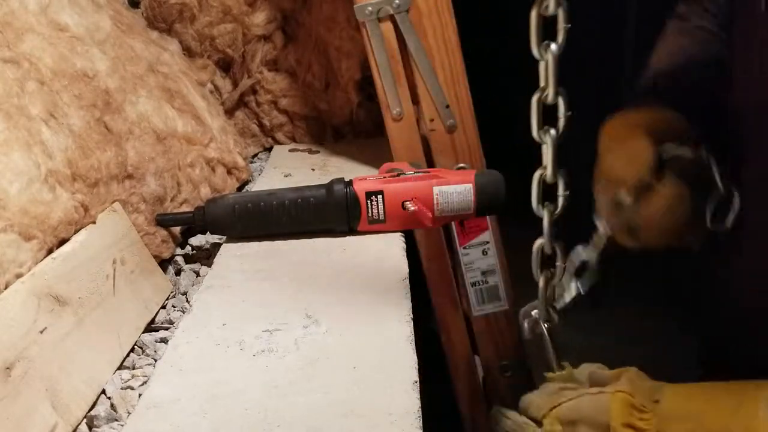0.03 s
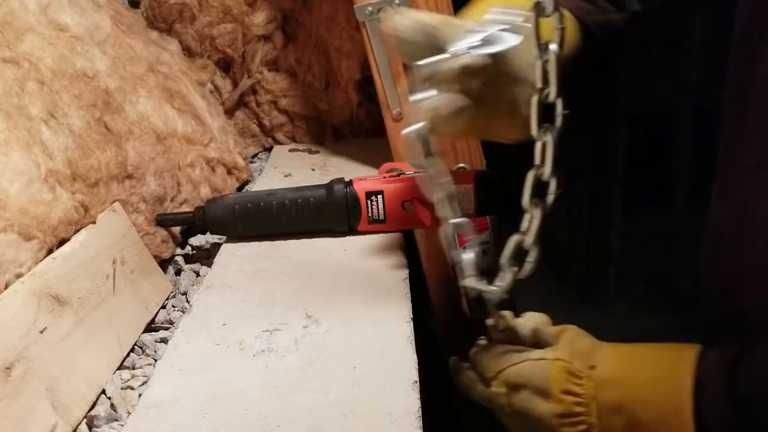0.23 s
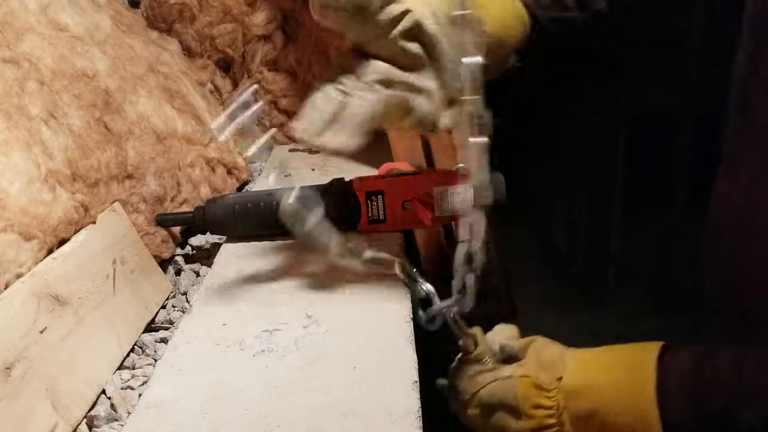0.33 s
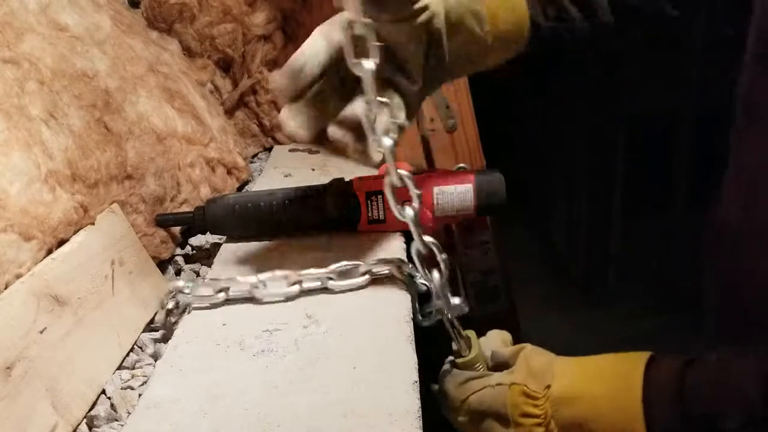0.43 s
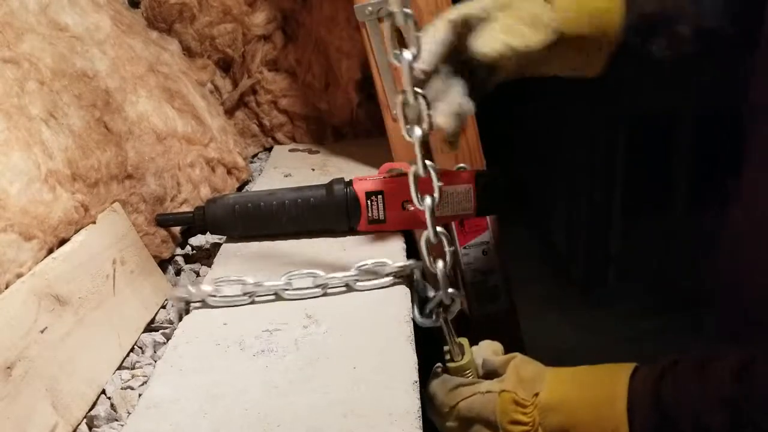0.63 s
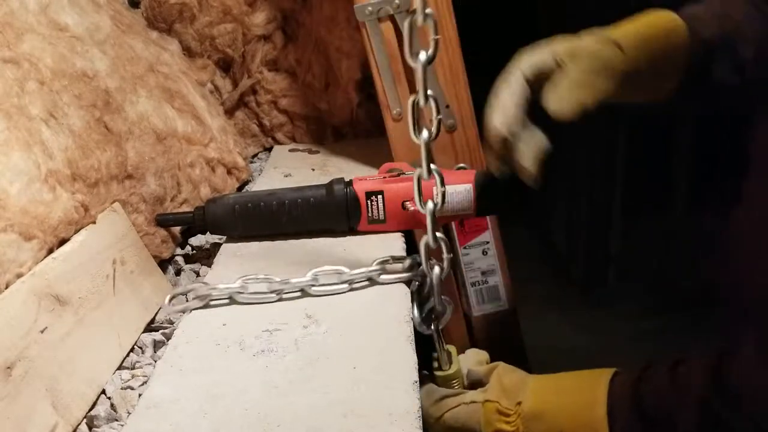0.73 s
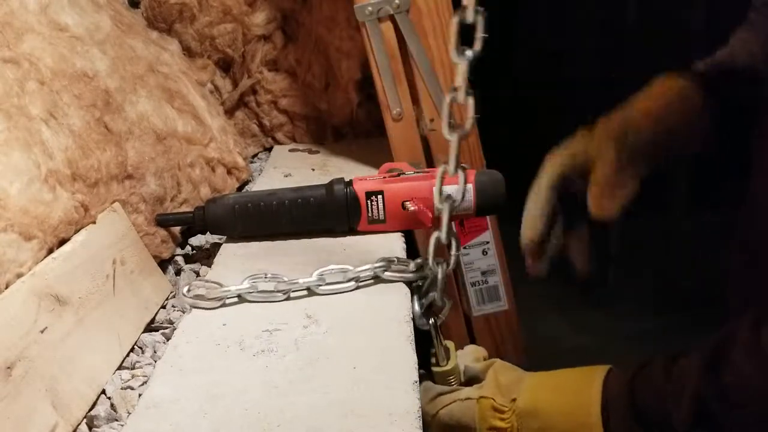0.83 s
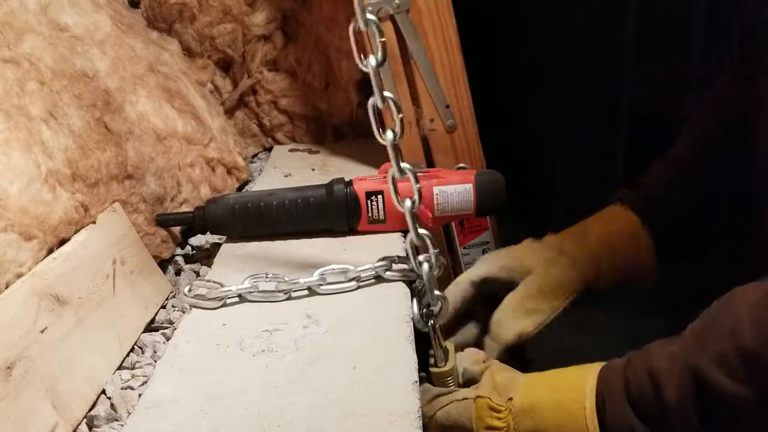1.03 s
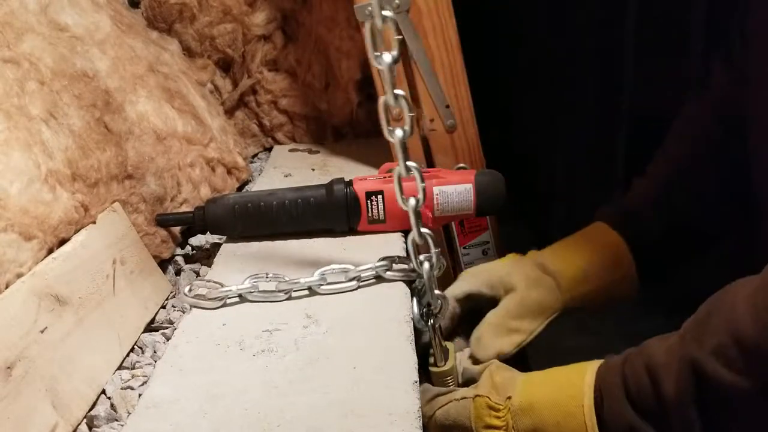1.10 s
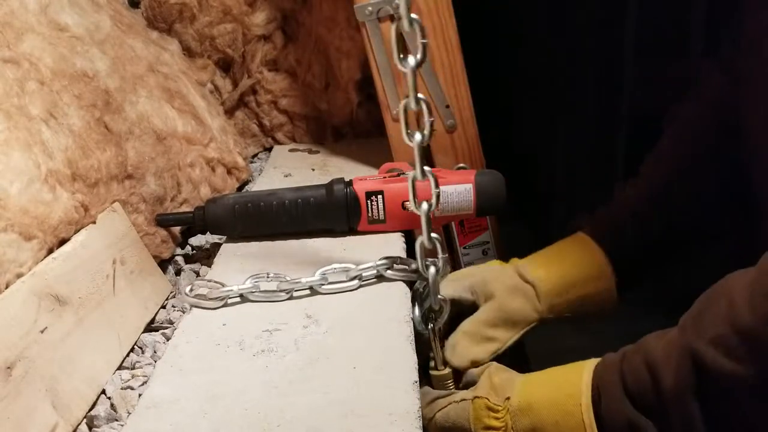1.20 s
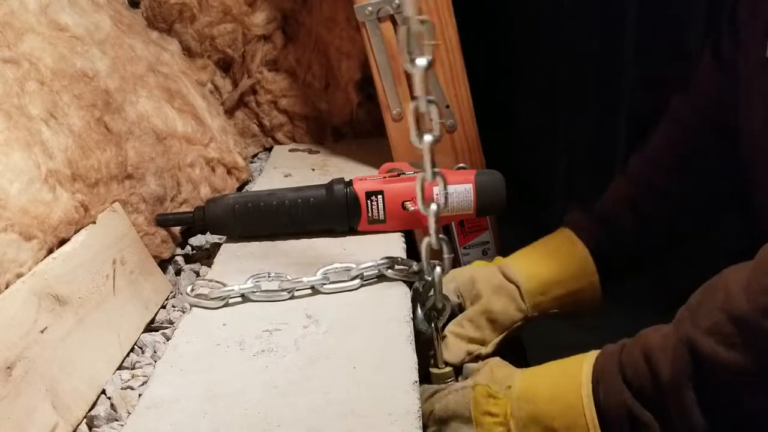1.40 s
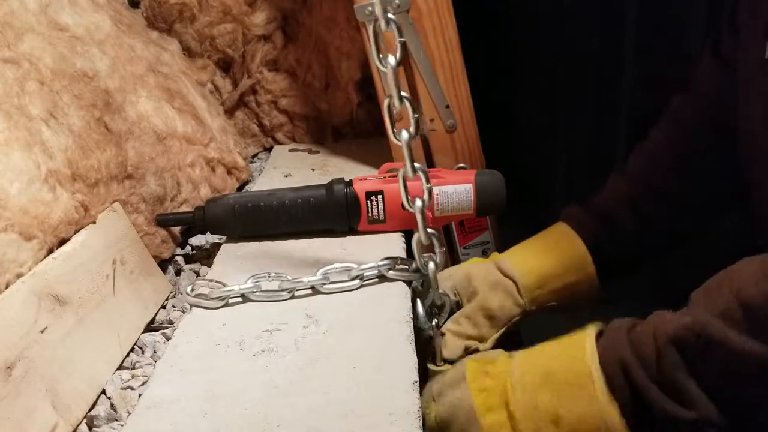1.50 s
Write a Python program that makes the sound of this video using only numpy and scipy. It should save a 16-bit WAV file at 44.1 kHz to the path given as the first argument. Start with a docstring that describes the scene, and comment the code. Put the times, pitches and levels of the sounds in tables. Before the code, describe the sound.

A steel chain clinks close by, its clicks and very high ringing building from about 0.2 seconds. Near 0.4 seconds it lands on a block with a loud hollow clack, a thump and a brief scrape. Lighter clinks follow as it settles until about 0.9 seconds, then a few faint ticks up to 1.5 seconds. Gloves and sleeves rustle softly throughout, with dull bumps over a low workshop rumble.

```python
"""A steel chain swung over a block, close to a single microphone in a small workshop.
Link strikes link with a click and a very high ring; the chain lands with a hollow clack and a thump,
then scrapes and settles. Work gloves crease, sleeves rustle and rub, and hands and links tap and
nudge the block. The walls give the strikes a short tail, and a low room rumble lies under it all."""
import sys
import numpy as np
from scipy import signal
from scipy.fft import rfft, irfft, next_fast_len
from scipy.io import wavfile
from scipy.ndimage import map_coordinates

SR = 44100
rng = np.random.default_rng(int(sys.argv[2]) if len(sys.argv) > 2 else 0)


def dump_mix(stems):
    """Bounce the given channels to the path in sys.argv[1] as a 16-bit WAV at rate SR."""
    frames = np.atleast_2d(stems).T  # one column per channel
    limited = np.clip(frames, -1, 1)  # hard clip at full scale
    pcm = np.round(limited * 32767).astype(np.int16)
    wavfile.write(sys.argv[1], SR, pcm)


N = 68355


def amp(db):
    """Decibels to gain."""
    return 10 ** (np.asarray(db) / 20)


def unit(x):
    """x scaled to rms 1."""
    return x / np.sqrt(np.mean(x ** 2) + 1e-20)


def along(points, hz):
    """Interpolates (frequency_hz, value) points on a log frequency axis."""
    knots_hz, values = np.transpose(points)
    return np.interp(np.log(hz + 1), np.log(knots_hz + 1), values)


def level(rows):
    """A gain for each sample from (time_s, level_db) points."""
    time_s, level_db = np.transpose(rows)
    return amp(np.interp(np.arange(N) / SR, time_s, level_db))


def wobble(rate_hz):
    """A smooth random curve with rate_hz knots a second."""
    knots = rng.standard_normal(int(N * rate_hz / SR) + 4)
    return map_coordinates(knots, [np.arange(N) * rate_hz / SR])


def filtered(x, response):
    """x shaped by a gain that depends on frequency."""
    size = next_fast_len(len(x) + 8192)
    return irfft(rfft(x, size) * response(np.fft.rfftfreq(size, 1 / SR)), size)[:len(x)]


def noise(spectrum, length=N):
    """Coloured noise of rms 1."""
    return unit(filtered(rng.standard_normal(length), lambda hz: amp(along(spectrum, hz))))


def grainy(spectrum, grain_db):
    """Friction: noise broken into millisecond grains that come in clumps."""
    grains = 1.6 * np.tanh((wobble(900) + .6 * wobble(160)) / 1.6)
    return unit(noise(spectrum) * amp(grain_db * grains))


def add(out, start_s, x):
    """Mixes x into out at start_s."""
    part = out[max(round(start_s * SR), 0):][:len(x)]
    part += x[:len(part)]


# Spectrum of the quiet workshop: frequency_hz, relative_db
ROOM_TONE = [(12, -38.5), (20, -2), (49, -1), (158, 3), (377, -28.5), (574, -16), (976, -26.5), (1400, -28),
             (1760, -28.5), (5850, -41.5), (11400, -50), (14700, -37.5), (16000, -34.5)]
def room_tone():
    """The place itself: a steady low rumble with a trace of hiss."""
    return amp(-58.5) * noise(ROOM_TONE)


# Swishes of gloves and sleeves: time_s, relative_db
SWISHES = [(0, -53.5), (.06, -51), (.11, -49), (.2, -45.5), (.29, -39.5), (.33, -40), (.45, -44),
           (.54, -72), (.585, -41.5), (.66, -69), (.72, -46.5), (.78, -56.5), (.82, -88), (.88, -93),
           (.905, -50), (.98, -54.5), (1.05, -74), (1.1, -55.5), (1.17, -44), (1.2, -46), (1.25, -62.5),
           (1.32, -61), (1.39, -46), (1.47, -47), (1.55, -60)]
# Spectrum of cloth friction: frequency_hz, relative_db
CLOTH_SPECTRUM = [(120, -49.5), (200, -21.5), (254, -1), (424, -4.5), (500, -1.5), (916, -3.5), (1420, 1.5),
                  (1650, -17), (1770, -3.5), (4120, -11), (11900, -20), (14600, -24), (16000, -33)]
# Crisp creases of the gloves: time_s, level_db
GLOVE_CREASES = [(0, -57.5), (.08, -58), (.21, -47), (.3, -45.5), (.5, -93), (.58, -52.5), (.75, -60.5),
                 (.87, -82.5), (.93, -61.5), (1.05, -82.5), (1.18, -58), (1.3, -70.5), (1.4, -50.5),
                 (1.47, -47), (1.55, -73)]
# Spectrum of creasing leather: frequency_hz, relative_db
LEATHER_SPECTRUM = [(800, 14), (2200, 8.5), (4200, 9), (7000, 4.5), (11000, -14), (15500, -33)]
# Swells of the handling rumble: time_s, level_db
HANDLING_SWELLS = [(0, -52.5), (.3, -56), (.5, -59.5), (.6, -48.5), (.76, -56.5), (.95, -57), (1.07, -62.5),
                   (1.26, -61.5), (1.4, -68), (1.52, -52.5)]
# Spectrum of that rumble: frequency_hz, relative_db
HANDLING_SPECTRUM = [(20, -11), (48, -1.5), (90, -6), (165, -7), (260, -11), (450, -26.5), (580, -6.5),
                     (750, -37.5), (2000, -66)]
def hands():
    """Hands take hold of the chain: sleeves swish, leather creases and the handling rumbles softly."""
    cloth = amp(-4) * level(SWISHES) * grainy(CLOTH_SPECTRUM, grain_db=3)
    leather = level(GLOVE_CREASES) * grainy(LEATHER_SPECTRUM, grain_db=3.6)
    rumble = level(HANDLING_SWELLS) * noise(HANDLING_SPECTRUM)
    return cloth + leather + rumble


# Strokes of cloth on cloth: time_s, level_db
SLEEVE_STROKES = [(0, -73), (.1, -57.5), (.18, -43.5), (.3, -70), (.54, -62.5), (.597, -47), (.66, -65.5),
                  (.72, -55.5), (.87, -84), (.9, -52.5), (.98, -62), (1.05, -74), (1.17, -46), (1.28, -75),
                  (1.39, -52.5), (1.55, -64.5)]
def sleeve_rub(pitch_hz=1393, width_hz=210):
    """Sleeve friction sings a faint, hollow note in one narrow resonance."""
    resonance = lambda hz: 1 / (1 + ((hz - pitch_hz) / width_hz) ** 2) ** 2
    return level(SLEEVE_STROKES) * unit(filtered(rng.standard_normal(N), resonance))


def bump(pitch_hz, level_db, rise_s, drift_rad=.84):
    """A soft contact: one low, unsteady mode swells and fades."""
    t = np.arange(N) / SR
    swell = (t / rise_s * np.exp(1 - t / rise_s)) ** 2
    return amp(level_db) * swell * np.sin(2 * np.pi * pitch_hz * t + drift_rad * wobble(70))


# Soft bumps on the block and its base: start_s, pitch_hz, level_db, rise_s
NUDGES = [(0.017, 75.5, -42.5, 0.015), (.095, 100, -44.5, 0.019), (0.227, 70, -49, 0.029),
          (0.282, 370, -37.5, 0.0044), (.315, 578, -41, 0.013), (0.319, 154, -40.5, 0.023),
          (0.439, 140, -47, 0.018), (.505, 52.6, -50, 0.016), (.56, 233.6, -49, 0.022),
          (0.601, 173.5, -43, 0.018), (.715, 79, -41.5, 0.024), (0.809, 61.7, -44.5, 0.029),
          (.9, 54.4, -48.5, 0.037), (0.959, 239, -55.5, 0.022), (1.244, 131, -50.5, 0.057),
          (1.485, 599, -44.5, 0.0067), (1.497, 168, -47.5, 0.019)]
def nudges():
    """Hands and chain nudge the block, stirring one low mode each time."""
    out = np.zeros(N)
    for start_s, pitch_hz, level_db, rise_s in NUDGES:
        add(out, start_s, bump(pitch_hz, level_db, rise_s))
    return out


# Reverberation of the workshop: frequency_hz, t60_s
WORKSHOP_DECAY = [(100, 0.64), (1000, 0.26), (5000, 0.23), (15000, 0.23)]
def workshop(x, wet_db=-11):
    """Close up the direct sound leads; the walls add a short tail that dies faster in the treble."""
    hz, t, bands = signal.stft(rng.standard_normal(SR // 4), SR, nperseg=256)
    decay = amp(-60 * t / along(WORKSHOP_DECAY, hz)[:, None])
    tail = signal.istft(bands * decay, SR, nperseg=256)[1]
    tail = np.pad(tail, (SR // 400, 0)) / np.linalg.norm(tail)  # 2.5 ms behind the direct sound
    return x + amp(wet_db) * signal.fftconvolve(x, tail)[:len(x)]


# Dull taps on the block: start_s, level_db, t60_s
BLOCK_TAPS = [(.104, -37.5, .035), (0.2856, -31.5, 0.018), (0.578, -33.5, 0.045), (.683, -49, 0.031),
              (.893, -51, 0.073), (1.1985, -41, 0.0069)]
# Spectrum of a tap: frequency_hz, relative_db
TAP_SPECTRUM = [(300, 1), (900, -10.5), (1450, 6), (2400, -8.5), (4000, -15), (8000, -26), (16000, -31)]
def taps():
    """Glove and links touch the block in short, dull contacts with hardly any ring."""
    out, t = np.zeros(N), np.arange(N) / SR
    for start_s, level_db, t60_s in BLOCK_TAPS:
        add(out, start_s, amp(level_db - 60 * t / t60_s) * noise(TAP_SPECTRUM))
    return workshop(out)


# Link striking link, at relative levels: start_s, click_db, ring_db
LINK_STRIKES = [(0.1061, -39.5, -55), (0.2442, -19.5, -10.5), (0.2485, -24.5, -15.5), (.283, -15, -13),
                (0.2843, -18.5, -35), (.2885, -17, -27), (0.308, -25, -48), (0.3415, -12, -23.5),
                (.3456, -22, -16), (0.3476, -30, -24), (0.3526, -14, -31), (0.3666, -9, -19),
                (0.3721, -7.5, -26), (0.3769, -27, -17), (0.3888, -36, -18), (0.3913, -27, -22.5),
                (0.3938, -35.5, -9.5), (.399, -30, -11.5), (0.4085, -46.5, -14.5), (.456, -31, -38),
                (0.4744, -35, -34), (0.486, -41, -25), (0.5546, -30.5, -35), (.591, -47, -43),
                (0.6101, -31, -30.5), (0.621, -28, -37), (0.629, -26.5, -35), (.6617, -28, -20),
                (0.6696, -24.5, -39), (0.6997, -34, -65.5), (0.7123, -31.5, -50), (0.724, -39, -41),
                (.783, -33, -30.5), (0.7883, -34.5, -41), (.847, -50.5, -82.5), (0.9189, -28, -36.5),
                (0.9254, -45, -45), (.985, -40, -68), (1.135, -43, -75), (1.347, -45.5, -64),
                (1.4285, -40, -47.5), (1.47, -41, -56), (1.478, -32, -48.5)]
# Modes of one steel link: pitch_hz, relative_db, t60_s
LINK_MODES = [(14197, 0, .11), (14278, -3, .09), (14420, -2, .055), (14480, -14, .24), (14640, -9, .04),
              (15010, -7, .045), (15100, -7, .06), (15177, -4, .07), (15285, -8, .055), (15412, -4, .09),
              (15620, -11, .04), (13700, -14, .02)]
# Spectrum of the contact click: frequency_hz, relative_db
CLICK_SPECTRUM = [(300, -10), (1200, -3), (2500, -1), (4000, 5), (5800, 3.5), (8000, 2.5), (11000, -1),
                  (13200, 2), (14500, 6.5), (16000, -1)]
def clinks(spread_hz=36, scatter_db=2, attack_s=.0005, click_t60_s=.012):
    """Each contact is a sharp click and the very high ring of a slightly different link."""
    out, t = np.zeros(N), np.arange(SR // 3) / SR
    pitch_hz, mode_db, t60_s = np.transpose(LINK_MODES)[:, :, None]
    for start_s, click_db, ring_db in LINK_STRIKES:
        detune, strength, phase = rng.standard_normal((3, len(LINK_MODES), 1))
        decay = amp(mode_db + scatter_db * strength - 60 * t / t60_s)
        modes = decay * np.sin(2 * np.pi * ((pitch_hz + spread_hz * detune) * t + phase))
        ring = modes.sum(0) * (1 - np.exp(-t / attack_s))
        ring /= ring[:SR // 100].std()  # rms 1 over the first 10 ms
        click = noise(CLICK_SPECTRUM, len(t)) * amp(-60 * t / click_t60_s)
        add(out, start_s, workshop(amp(ring_db - 4.5) * ring + amp(click_db - 3.5) * click))
    return out


# Surges of the sliding chain: time_s, level_db
SLIDE_SURGES = [(.18, -48), (.215, -47), (.24, -55), (.275, -38.5), (.30, -47), (.332, -56), (.362, -34.5),
                (.395, -26), (.42, -39.5), (.47, -53), (.53, -73), (.62, -52), (.65, -58), (.73, -60.5),
                (.82, -83)]
# Spectrum of scraping steel: frequency_hz, relative_db
SCRAPE_SPECTRUM = [(500, -12), (2000, -1.5), (5000, -6), (9000, 3.5), (12500, -0.5), (13700, 6.5),
                   (14400, 12.5), (15400, 6), (16000, -10)]
def sliding():
    """Countless tiny contacts, for as long as the links run over each other and the block."""
    t = np.arange(N) / SR
    moving = (t > SLIDE_SURGES[0][0]) & (t < SLIDE_SURGES[-1][0])
    return moving * level(SLIDE_SURGES) * grainy(SCRAPE_SPECTRUM, grain_db=2.2)


# Modes of the block: pitch_hz, level_db, rise_s, damped_t60_s
BLOCK_MODES = [(367.3, -23.5, 0.019, 0.081), (1058.8, -11, 0.00044, 0.015), (1124, -34, 0.0009, .06),
               (1054, -31.5, .002, 0.15), (1610, -29, 0.0013, 0.14), (1974, -32.5, 0.00057, 0.087)]
# Spectrum of the noisy knock of the block's body: frequency_hz, relative_db
KNOCK_SPECTRUM = [(60, -18.5), (170, -0.5), (300, -11), (550, 3), (800, -7), (1250, -0.5), (1950, -11),
                  (2500, -8.5), (3400, -13), (5000, -42.5)]
def landing(start_s=.37965, free_ring_s=.024, clack_hz=1520, clack_width_s=.00028, knock_t60_s=.061):
    """The chain hits the block: a one-cycle clack, a hollow ring and a slow thump of the base."""
    out, t = np.zeros(N), np.arange(N) / SR
    pitch_hz, level_db, rise_s, t60_s = np.transpose(BLOCK_MODES)[:, :, None]
    # The block sags 2 dB while it rings freely, then the chain damps it.
    fade_db = 2 * np.minimum(t / free_ring_s, 1) + 60 * np.maximum(t - free_ring_s, 0) / t60_s
    envelope = amp(level_db - fade_db) * (1 - np.exp(-t / rise_s))
    ring = (envelope * np.sin(2 * np.pi * pitch_hz * t)).sum(0)
    lag = t - 2 * clack_width_s
    clack = -np.exp(-(lag / clack_width_s) ** 2 / 2) * np.sin(2 * np.pi * clack_hz * lag)
    knock = amp(-15.5 - 60 * t / knock_t60_s) * noise(KNOCK_SPECTRUM)
    impact = workshop(ring + clack + knock, wet_db=-15.5)
    thump = bump(pitch_hz=54, level_db=-37.5, rise_s=.026)
    add(out, start_s, impact + thump)
    return out


def scene():
    """Chain, block and hands as they reach one close microphone in the quiet workshop."""
    chain = clinks() + landing() + sliding()
    return (chain + hands() + sleeve_rub() + taps() + nudges() + room_tone())[None]


def record(dry):
    """The recorder rounds off peaks at full scale and drops the deepest bass and the highest treble."""
    low_cut_hz, top_hz = 36, 15800
    rounded = dry[0] / (1 + dry[0] ** 8) ** (1 / 8)
    low_cut = lambda hz: hz ** 4 / np.sqrt(hz ** 8 + low_cut_hz ** 8)
    high_cut = lambda hz: 1 / np.sqrt(1 + (hz / top_hz) ** 240)
    return filtered(rounded, lambda hz: low_cut(hz) * high_cut(hz))[None]


dry = scene()
out = record(dry)
dump_mix(out)
```